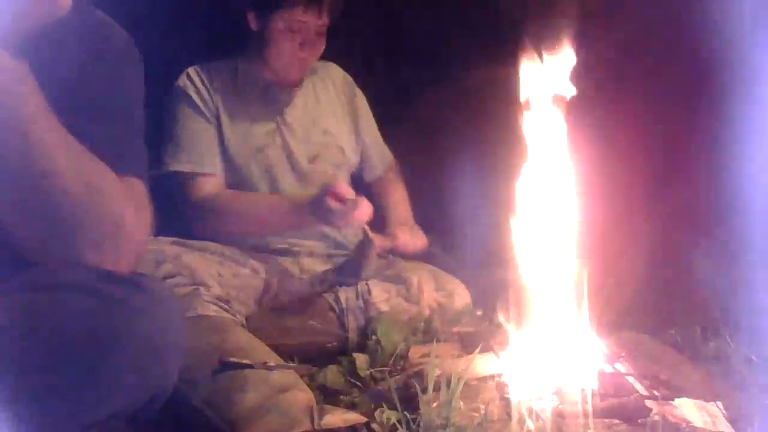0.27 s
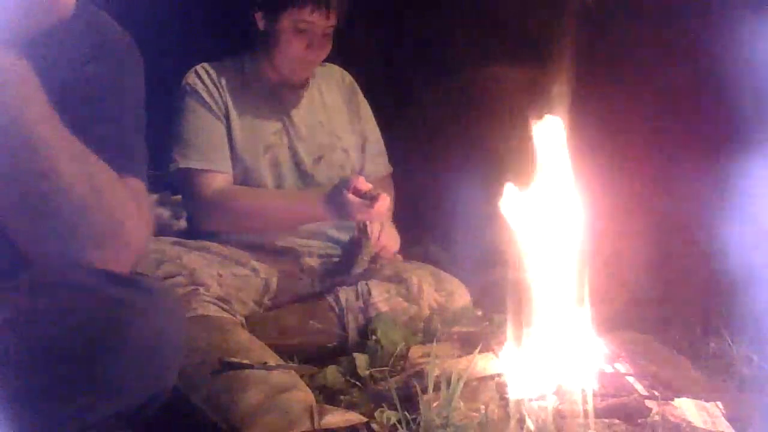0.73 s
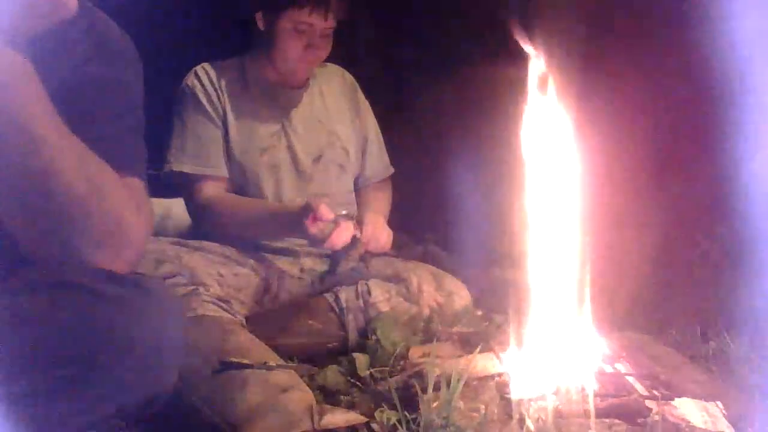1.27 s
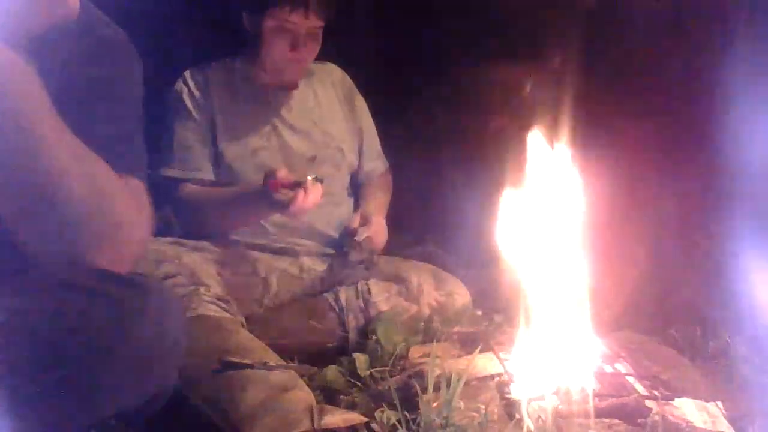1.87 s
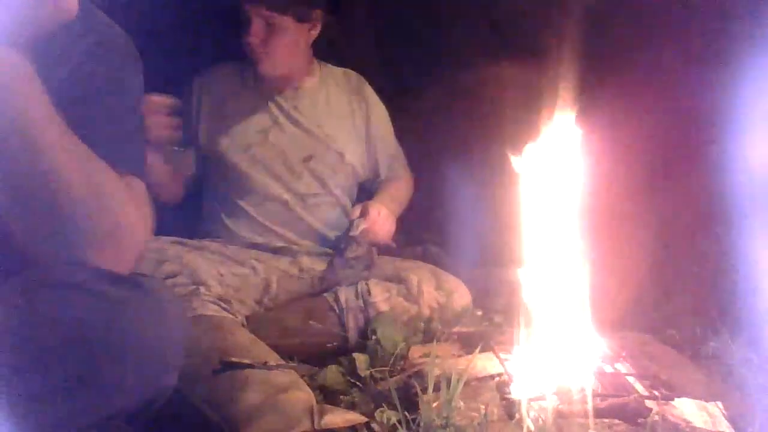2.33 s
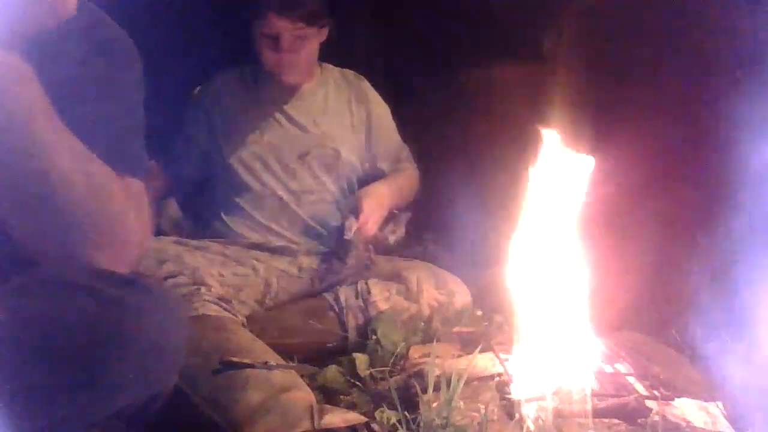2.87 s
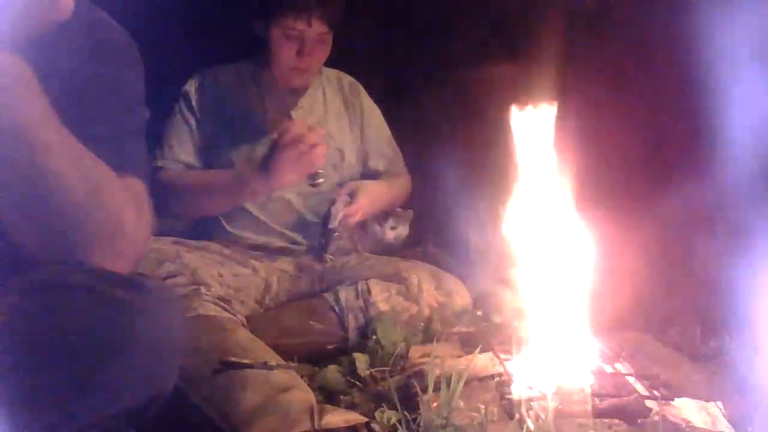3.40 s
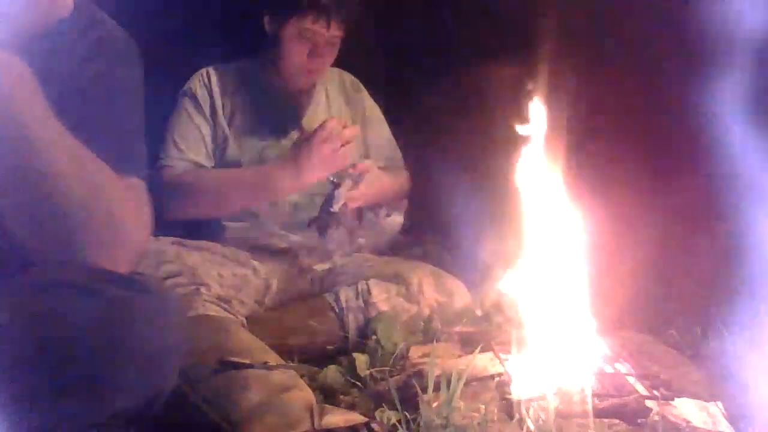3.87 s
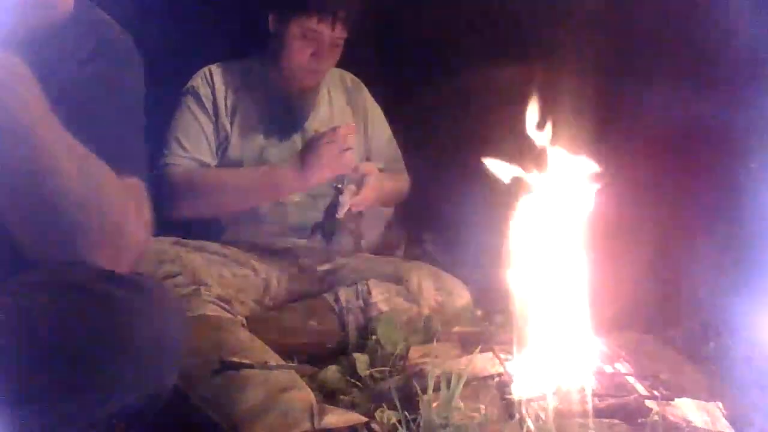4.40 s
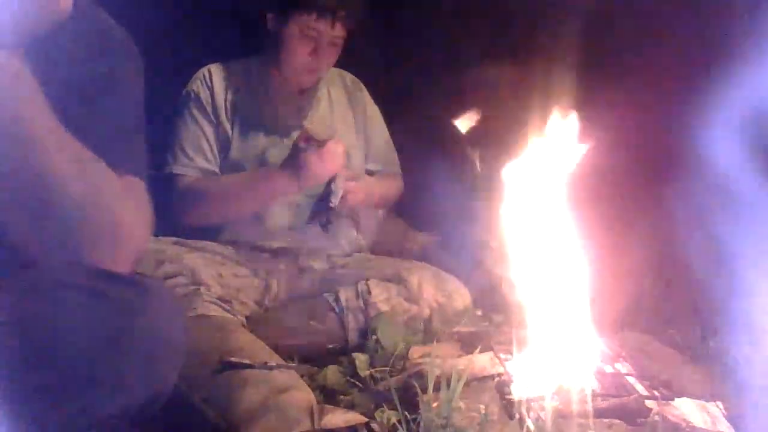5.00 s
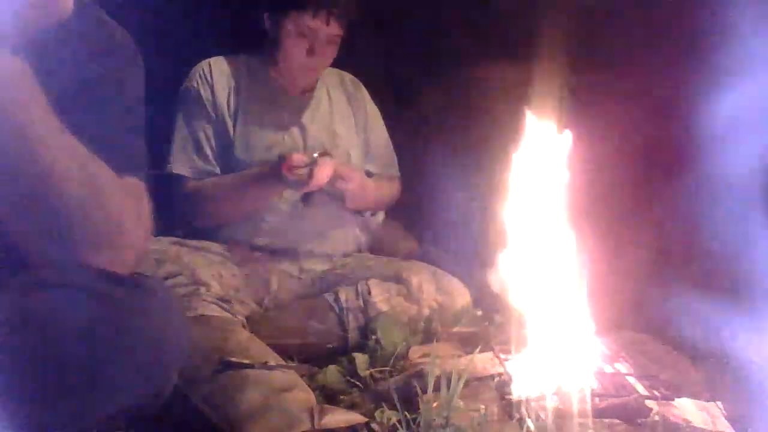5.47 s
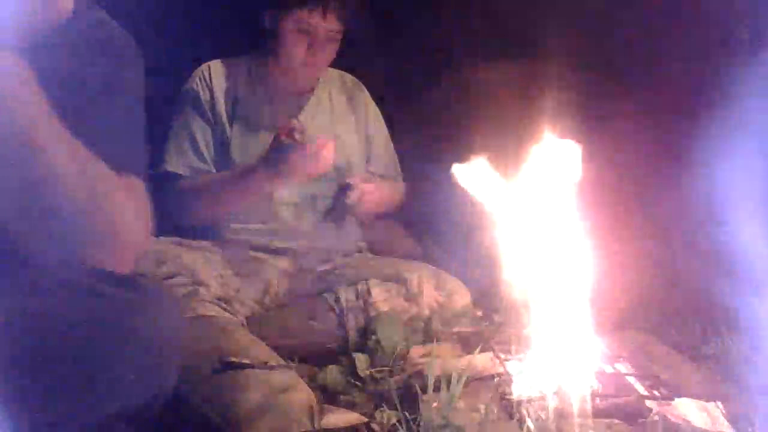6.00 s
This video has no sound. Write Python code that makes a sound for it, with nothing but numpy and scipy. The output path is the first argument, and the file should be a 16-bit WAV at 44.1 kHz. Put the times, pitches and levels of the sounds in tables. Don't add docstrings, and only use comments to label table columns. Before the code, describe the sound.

Outdoors in the woods, a cheap microphone near a fire picks up soft low flutter, steady hiss and a thin distant cricket band. A spark pops, dry wood cracks violently with a dull thump, then an owl calls: one longer hoarse hoot, a short one, and after a run of fine ticks and a sharp snap, another short one cut off by the end.

```python
import sys
import numpy as np
from scipy import signal
from scipy.fft import rfft, irfft
from scipy.io import wavfile
from scipy.ndimage import uniform_filter1d

SR = 44100
rng = np.random.default_rng(int(sys.argv[2]) if len(sys.argv) > 2 else 0)


def volts_from_decibels(level):
    exponent = np.asarray(level, float) / 20
    return 10 ** exponent


def file_out(sig):
    cols = np.atleast_2d(sig).T
    lim = np.clip(cols, -1, 1)
    pcm = np.round(lim * 32767).astype(np.int16)
    wavfile.write(sys.argv[1], SR, pcm)


N = 275139


def evened(x):
    return x / np.sqrt(np.mean(abs(x) ** 2) + 1e-20)


def read(points, hz):
    point_hz, value = np.transpose(points)
    return np.interp(np.log(hz + 1), np.log(point_hz + 1), value)


def add(mix, start_s, sound):
    part = mix[round(start_s * SR):][:len(sound)]
    part += sound[:len(part)]


def resonate(x, hz, width_hz, times=1):
    turn = np.exp(2j * np.pi * hz * np.arange(len(x)) / SR)
    r = np.exp(-np.pi * width_hz / SR)
    for _ in range(times):
        x = 2 * (turn * signal.lfilter([1 - r], [1, -r], x / turn)).real
    return x


def coloured(size, spectrum):
    gain = volts_from_decibels(read(spectrum, np.fft.rfftfreq(size, 1 / SR)))
    return evened(irfft(rfft(rng.standard_normal(size)) * gain, size))


def wobble(size, hz):
    span = max(round(SR / hz / 2), 1)
    noise = rng.standard_normal(size)
    return evened(uniform_filter1d(uniform_filter1d(noise, span), span))


# [Hz, dB per Hz]
HISS_SPECTRUM = [(12, -24.5), (22, -1), (52, -3.5), (120, -11.5), (220, -20), (420, -24), (900, -29),
                 (3000, -32.5), (6000, -35), (8500, -33.5), (11000, -29), (15400, -29.5), (17000, -34)]


def fire_floor():
    frames, hz = N // 128 + 9, np.fft.rfftfreq(512, 1 / SR)
    a, b, patches = rng.standard_normal((frames, 257, 3)).T
    patches_db = evened(uniform_filter1d(uniform_filter1d(patches, 30, 0), 8, 1))
    flicker = uniform_filter1d(rng.exponential(1, frames) ** 2, 2)
    treble = np.clip(hz / 8000, 0, 1)[:, None]
    flicker_db = 0.45 * np.minimum(flicker, 12) * treble
    noise = (a + 1j * b) * volts_from_decibels(patches_db + flicker_db)
    noise = signal.istft(noise, nperseg=512, noverlap=384)[1][:N]
    hz = np.fft.rfftfreq(N, 1 / SR)
    z = rfft(noise) * volts_from_decibels(read(HISS_SPECTRUM, hz))
    flutter = irfft(z * (hz < 200), N) * volts_from_decibels(1.1 * wobble(N, hz=9.4))
    hiss = irfft(z * (hz >= 200), N)
    return volts_from_decibels(-40.5) * evened(flutter + hiss)


# [Hz, Hz, dB]
CRICKET_BANDS = [(4236, 530, 17), (4440, 227, 2)]


def crickets():
    noise = rng.standard_normal(N)
    band = sum(volts_from_decibels(db) * resonate(noise, hz, width, times=2) for hz, width, db in CRICKET_BANDS)
    throb_db = 1.5 * wobble(N, hz=45) + wobble(N, hz=3)
    return volts_from_decibels(-51 + throb_db) * evened(band)


# [s, dB, Hz, s to fall 60 dB]
DULL_KNOCKS = [(0.201, -46, 450, 0.27), (0.499, -45.5, 240, 0.14), (1.031, -13, 75, 0.034),
               (1.456, -23.5, 500, 0.092), (1.503, -11.5, 500, 0.034), (1.535, -21.5, 500, 0.021),
               (1.577, -33.5, 359, 0.083), (1.594, -24.5, 244, 0.028), (2.199, -27, 44.3, 0.12),
               (2.52, -35, 450, 0.043), (4.93, -27, 69.5, 0.095), (5.18, -29.5, 665, 0.027),
               (5.181, -30, 240, 0.028), (5.47, -24, 740, 0.041), (5.469, -23.5, 200, 0.041),
               (5.51, -28.5, 715, 0.027), (5.5, -40, 450, 0.18), (5.545, -38.5, 472, 0.15),
               (5.74, -28, 960, 0.021)]


def knocks():
    out, t = np.zeros(N), np.arange(9000) / SR
    noises = rng.standard_normal((len(DULL_KNOCKS), 9000))
    for (s, db, hz, t60), noise in zip(DULL_KNOCKS, noises):
        rattle = .5 * evened(resonate(noise, hz, 0.54 * hz, times=2))
        ring = rattle - np.sin(2 * np.pi * hz * t)
        add(out, s, volts_from_decibels(db - 60 * t / t60) * ring * np.minimum(t / 0.0034, 1))
    return out


# [s, s, dB, dB/s]
TEARS = [
    (1.455, 0.0017, -18.5, 500),
    (1.474, 0.016, -26, 300),
    (1.495, 0.014, -24, 1500),
    (1.509, 0.023, -22.5, 1800),
    (1.533, .01, -33.5, 197),
    (3.47, .02, -45, 180),
    (5.454, .003, -33.5, 170),
    (5.496, 0.017, -38, 300),
    (5.512, .04, -34, 330),
]
# [Hz, dB per Hz]
RUSTLE_SPECTRUM = [(300, -12), (1200, -8.5), (2500, -7.5), (4500, -2), (9000, -4), (16000, 0)]
# [Hz, Hz]
FIBRE_SIZES = [(1500, 900), (4500, 2200), (7500, 3300), (11000, 8500), (14500, 2700)]


def rustles():
    out, t = np.zeros(N), np.arange(9000) / SR
    rise_s, tail_s = 0.009, 0.11
    for s, hold, db, dying_db in TEARS:
        noise = coloured(len(t), RUSTLE_SPECTRUM)
        grains = sum(resonate(noise, hz, width) * volts_from_decibels(3.9 * wobble(len(t), hz=250))
                     for hz, width in FIBRE_SIZES)
        grains = grains * volts_from_decibels(2.2 * wobble(len(t), hz=500))
        edges = np.minimum(t / rise_s, 1) * np.clip((hold + tail_s - t) / .03, 0, 1)
        fade = volts_from_decibels(db - dying_db * np.maximum(t - hold, 0))
        add(out, s, fade * evened(grains) * edges)
    return out


# [s, dB, Hz, s to fall 60 dB]
POPS = [
    (.1075, 4, 1013, 0.00059),
]
# [s, dB, Hz, s to fall 60 dB]
WOOD_SNAPS = [(.49, -40, 2000, .024), (.513, -36.5, 1720, 0.05), (1.133, -40, 2500, 0.022),
              (1.4557, 1.5, 8000, 0.025), (1.456, -14, 1200, 0.013), (1.4739, -1, 9000, 0.032),
              (1.5076, -7, 9400, 0.026), (1.533, -34, 1190, 0.015), (1.832, -29.5, 8050, .009),
              (3.4655, -30.5, 6500, 0.093), (3.934, -31.5, 6860, .013), (4.52, -28, 8400, 0.014),
              (4.66, -35, 9000, 0.023), (4.94, -29, 9070, 0.011), (4.993, -35.5, 2500, 0.065),
              (5.091, -28, 11100, .009), (5.147, -34, 5500, .012), (5.2957, -24, 10500, 0.013),
              (5.377, -25.5, 9900, 0.037), (5.443, -23.5, 4670, .03), (5.4538, -7, 8500, 0.011),
              (5.552, -22, 13000, 0.018), (5.583, -30, 4000, 0.019), (5.601, -32, 8000, .006),
              (5.645, -42, 8000, .009), (5.472, -32, 5000, .01), (5.53, -30, 6000, .01),
              (5.238, -34, 11000, .008), (1.627, -38, 8000, .008)]
# [s, dB, Hz, s to fall 60 dB]
SAP_TICKS = [(1.113, -39, 1300, 0.11), (1.475, -10.5, 5560, 0.05), (.1075, -1, 13900, 0.0064),
             (.1117, -17, 11000, .008), (3.472, -36, 5200, .12), (3.478, -41, 3300, 0.33),
             (5.2965, -15, 14000, 0.0077), (5.135, -35, 6500, .012), (1.92, -37, 8500, .018),
             (3.4647, -31, 3340, 0.19), (3.467, -38.5, 2220, 0.45), (3.933, -35, 2850, 0.043),
             (5.129, -30, 4400, .012), (5.1347, -23, 4170, 0.032), (5.2957, -18, 6500, 0.0097),
             (5.454, -23, 6600, .02), (5.51, -26, 5060, .03), (5.523, -30, 6750, .03)]


def cracks():
    sharp, soft, t = np.zeros(N), np.zeros(N), np.arange(9000) / SR
    click = 1. * (t == 0)
    for rows, share in ((POPS, 17.9), (WOOD_SNAPS, 0.87), (SAP_TICKS, 0.44)):
        noises = rng.standard_normal((len(rows), 9000))
        for (s, db, hz, t60), noise in zip(rows, noises):
            snap = resonate(click, hz, share * hz, times=3)
            puff = evened(resonate(noise, hz, share * hz, times=3))
            splinter = volts_from_decibels(-6.5 - 60 * t / min(.004, t60)) * puff
            add(sharp if db > -19 else soft, s, volts_from_decibels(db) * (snap / abs(snap).max() + splinter))
            add(soft, s, volts_from_decibels(db - 11.0 - 60 * t / t60) * puff)
    return sharp, soft


# [s, dB]
TRUNK_ECHOES = [(.035, -29), (.085, -18), (.15, -28.5)]
# [Hz, s to fall 60 dB, dB]
FOREST_TAIL = [(200, 1.4, -14.5), (450, 3.08, -30.5), (920, 1.58, -2.5), (1300, 2, -2), (2500, 1.1, -21)]


def woods(x):
    out, clock = np.zeros(N), np.arange(N) / SR
    band, t60, db = np.transpose(FOREST_TAIL)
    hz, t, z = signal.stft(rng.standard_normal((3, 3 * SR)), SR, nperseg=1024)
    t60, db = (np.interp(np.log(hz + 1), np.log(band), c)[:, None] for c in (t60, db))
    rise = np.clip(t / 0.015, 0, 1)
    early_db = 8.1 * np.exp(-t / 0.17)
    z = z * rise * volts_from_decibels(db - 60 * t / t60 + early_db)
    tails = signal.istft(z, SR, nperseg=1024)[1] / np.sqrt(.15 * SR)
    for k, tail in enumerate(tails):
        share = np.sqrt(2 / 3) * np.cos(np.pi * (1.581 * clock + k / 3))
        out += signal.fftconvolve(x * share, tail)[:N]
    for delay, echo_db in TRUNK_ECHOES:
        add(out, delay, volts_from_decibels(echo_db) * x)
    return out


# [s, dB, Hz]
HOOT_PATHS = [
    [(2.7, -54.5, 334), (2.72, -20, 340.4), (2.745, -13, 438.5), (2.805, -7.5, 457.6), (2.86, -11.5, 480),
     (2.95, -9.5, 428), (3.085, -11.5, 420.2), (3.125, -19, 362.2), (3.175, -28.5, 243)],
    [(3.69, -43, 331.7), (3.71, -17.5, 346.5), (3.73, -8.5, 443.7), (3.765, -6, 448.1),
     (3.79, -12.5, 482.4), (3.835, -7, 468.8), (3.852, -23, 421), (3.89, -34.5, 325)],
    [(5.97, -44, 265.7), (5.992, -22.5, 327.8), (6.015, -14, 405), (6.04, -5.5, 463.6), (6.1, -9.5, 478),
     (6.175, -9, 438), (6.192, -15.5, 390), (6.238, -38, 286)],
]
# [s, dB]
VOICE_CATCHES = [(2.734, -2), (2.747, -11.5), (2.767, -25), (2.78, -13.5), (2.789, -14), (2.824, -7.5),
                 (3.143, -14.5), (3.717, -8), (3.727, -3), (3.745, -14), (3.78, -0.5), (3.798, -5),
                 (3.823, -3.5), (6.006, -6.5), (6.026, -12.5), (6.06, -3.5), (6.097, -4), (6.161, -4.5),
                 (6.1865, -19)]
# [times the pitch, dB]
TONE_OVERTONES = [(2, -36), (3, -50)]
# [times the pitch, dB]
HALF_LINES = [(.5, -9), (1.5, 0.5), (2.5, -10.5), (4.5, -22.5)]
# [Hz, dB per Hz]
BREATH_SPECTRUM = [(150, -38), (260, -6), (420, -16), (700, -2), (1100, -23), (1450, -18), (1700, -29.5),
                   (2300, -26.5), (2700, -46), (4000, -68)]


def hoot(rows):
    s, effort_db, hz = np.transpose(rows)
    t = np.arange(s[0], s[-1], 1 / SR)
    size = len(t)
    effort_db, hz = np.interp(t, s, effort_db), np.interp(t, s, hz)

    easy_hz, strained_hz, tire_s = 424.6, 480, 0.054
    strain = np.clip((hz - easy_hz) / (strained_hz - easy_hz), 0, 1)
    tired = signal.lfilter([1 / (tire_s * SR)], [1, 1 / (tire_s * SR) - 1], strain)
    slack = np.clip((-15 - effort_db) / 13, 0, 1)
    ending = slack * (t > (s[0] + s[-1]) / 2)

    catch_s, shaken_s, deep_db = 0.0049, 0.015, -21.5
    catch_db = sum(db * np.exp(-.5 * ((t - at) * (1 + abs(db) / 10) / catch_s) ** 2)
                   for at, db in VOICE_CATCHES)
    shaken = sum((db / deep_db) ** 2 * np.exp(-.5 * ((t - at) / shaken_s) ** 2)
                 for at, db in VOICE_CATCHES)
    shaken = np.clip(shaken, 0, 1)

    hoarse = np.clip(0.11 * strain + 0.79 * slack + 0.33 * shaken, 0, 1)
    breath_db = -38 + 16 * strain + 24 * ending + 12 * shaken
    half_db = -36.5 + 14.5 * tired + 18 * ending + 4 * shaken

    turn = np.exp(1j * np.pi * np.cumsum(hz) / SR)
    uneven = evened(wobble(size, hz=191) + 1j * wobble(size, hz=204))
    blur = np.sqrt(1 - hoarse ** 2) + hoarse * uneven
    tone = turn ** 2 + sum(volts_from_decibels(db) * turn ** (2 * k) for k, db in TONE_OVERTONES)
    halves = sum(volts_from_decibels(db + 2.9 * wobble(size, hz=30.7)) * turn ** round(2 * k) for k, db in HALF_LINES)
    smear = 0.82 + 0.34 * evened(wobble(size, hz=90) + 1j * wobble(size, hz=90))
    voice = np.sqrt(2) * (volts_from_decibels(catch_db) * blur * tone + volts_from_decibels(half_db) * smear * halves).imag
    voice = signal.sosfilt(signal.butter(4, 215, "high", fs=SR, output="sos"), voice)

    whistle = volts_from_decibels(-48.5) * evened(resonate(rng.standard_normal(size), 5700, 50, times=2))
    whistle = np.clip((t - s[0]) / 0.22, 0, 1) ** 2 * whistle
    breath = volts_from_decibels(breath_db) * coloured(size, BREATH_SPECTRUM)
    sound = volts_from_decibels(effort_db) * (voice + whistle + breath)
    return s[0], sound * signal.windows.tukey(size, .04)


def scene():
    owl = np.zeros(N)
    for rows in HOOT_PATHS:
        add(owl, *hoot(rows))
    snaps, puffs = cracks()
    soft = fire_floor() + crickets() + knocks() + rustles() + puffs + woods(owl) + owl
    upper_edge = signal.firwin(511, 15800, window=("kaiser", 8), fs=SR)
    mono = snaps + signal.oaconvolve(soft, upper_edge, "same")
    return np.array([mono, mono])


# [Hz, 0-1]
APART_SHARE = [(6000, 0), (7500, .02), (9000, .11), (12500, .16), (14500, .13), (16000, .03)]


def drift_apart(x):
    window = ("kaiser", 8)
    hz, t, z = signal.stft(x, SR, window=window, nperseg=2048, noverlap=1024)
    edges = np.arange(400, 22800, 800)
    chance, angle = rng.random((len(t), len(edges), 2)).T
    power = (abs(z[0, hz > 6000]) ** 2).sum(0)
    steady = power < 6 * np.roll(power, 2)
    drifting = chance < read(APART_SHARE, edges)[:, None]
    angle = np.pi * (angle - .5) * drifting * steady
    patch = np.minimum(np.searchsorted(edges, hz - 400), len(edges) - 1)
    turn = np.exp(1j * angle[patch])
    z = z * np.array([turn, 1 / turn])
    return signal.istft(z, SR, window=window, nperseg=2048, noverlap=1024)[1][:, :N]


def low_pass(x):
    return signal.sosfilt(signal.butter(12, 17000, fs=SR, output="sos"), x)


def record(dry):
    mix = np.clip(drift_apart(dry), -1, 1)
    return low_pass(mix)


dry = scene()
out = record(dry)
file_out(out)
```